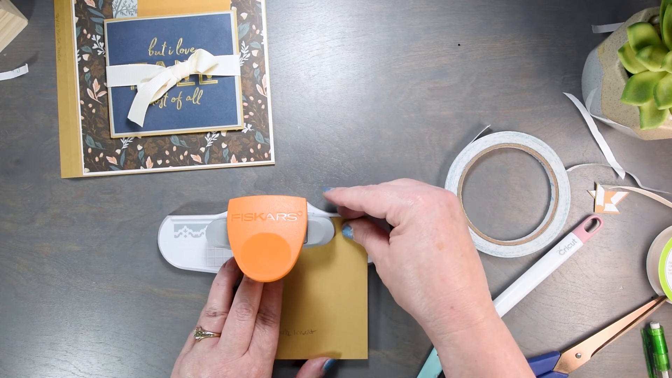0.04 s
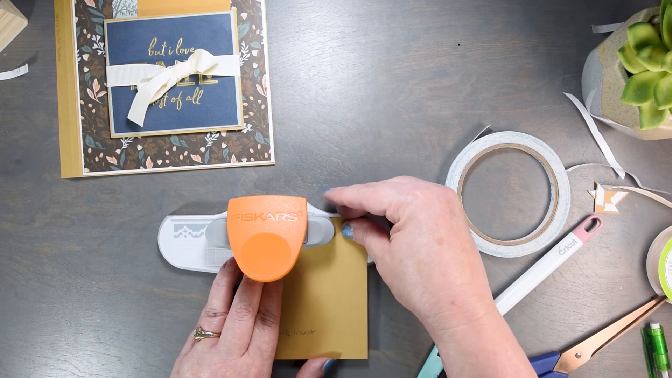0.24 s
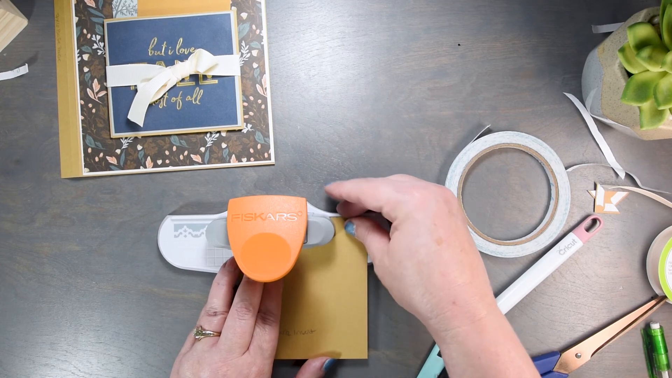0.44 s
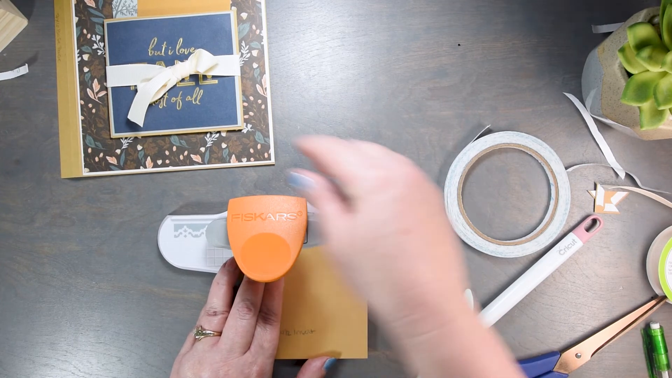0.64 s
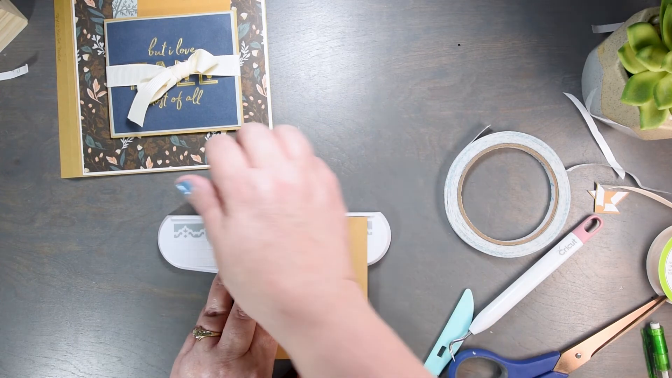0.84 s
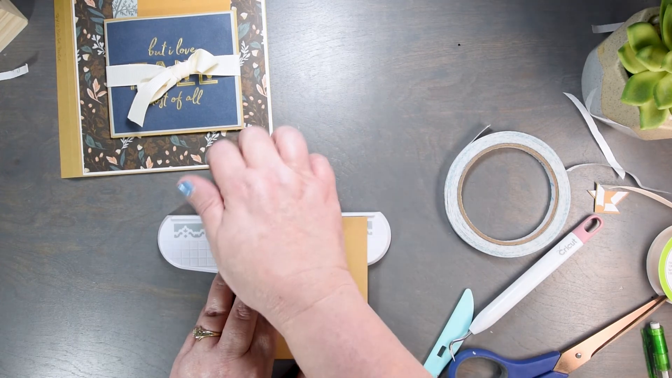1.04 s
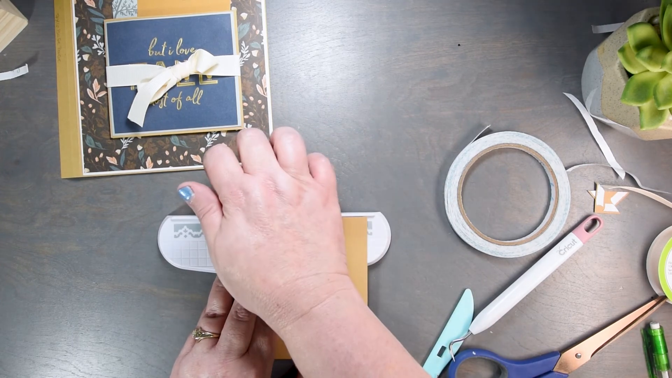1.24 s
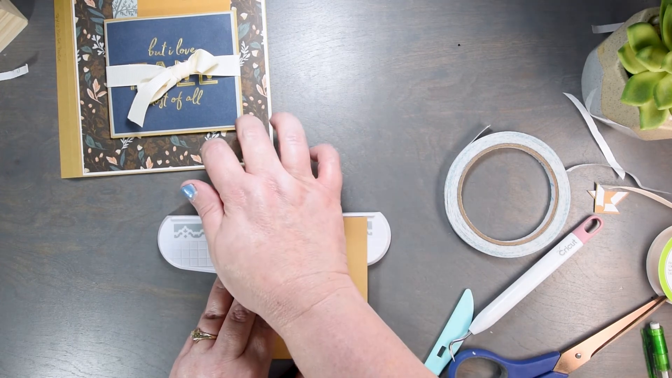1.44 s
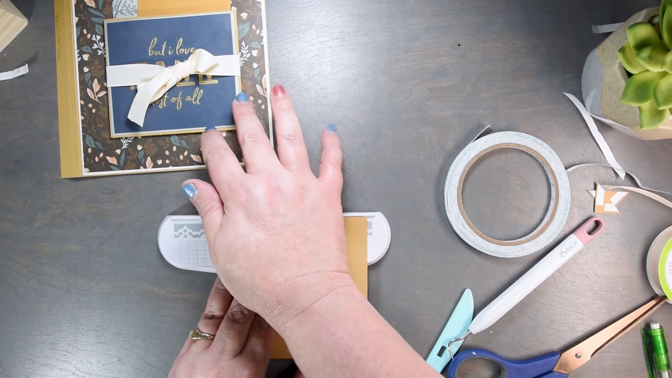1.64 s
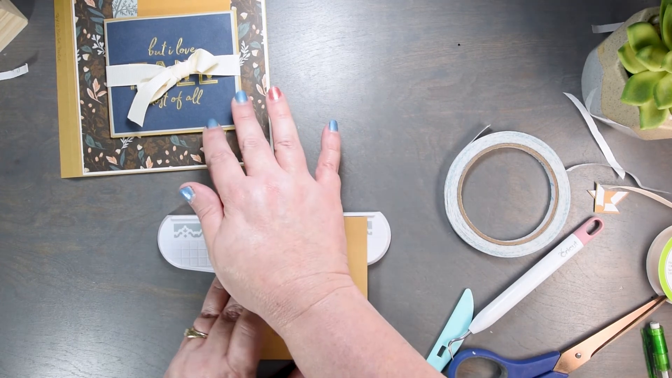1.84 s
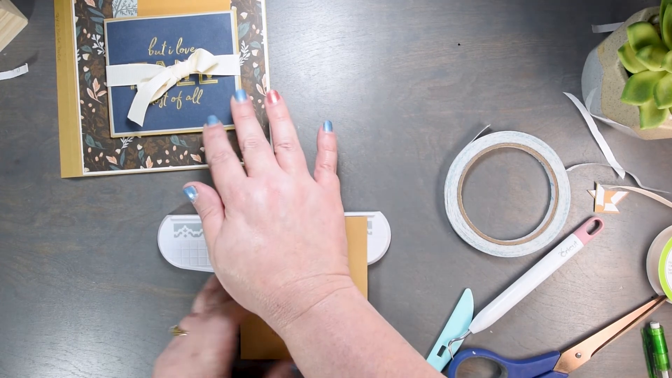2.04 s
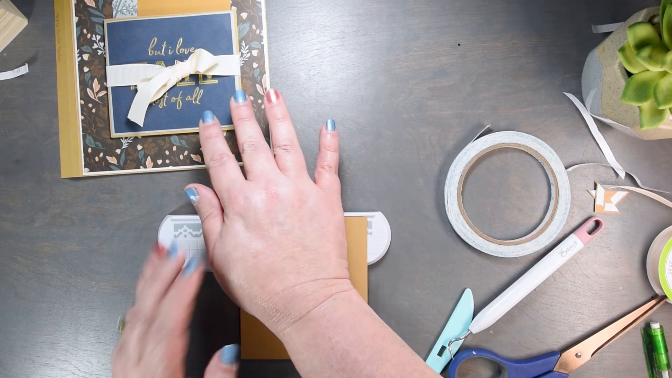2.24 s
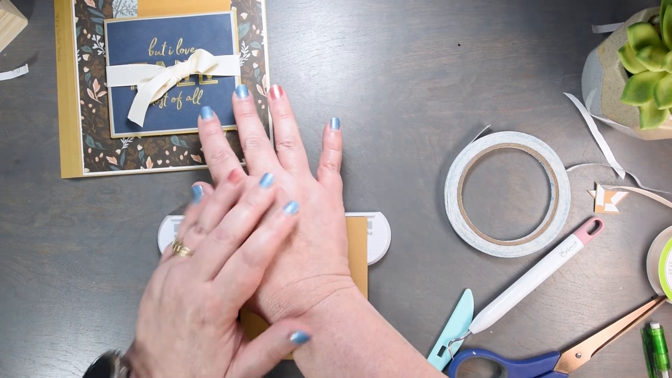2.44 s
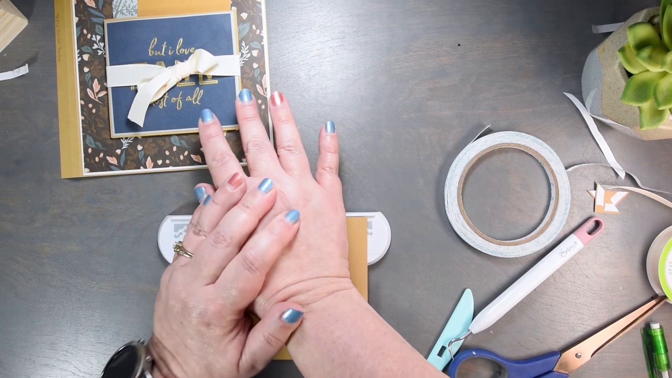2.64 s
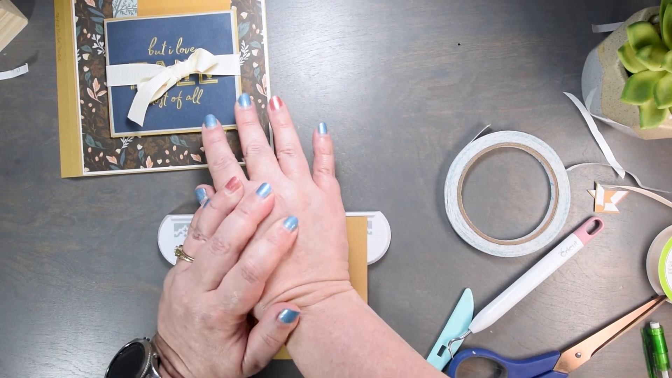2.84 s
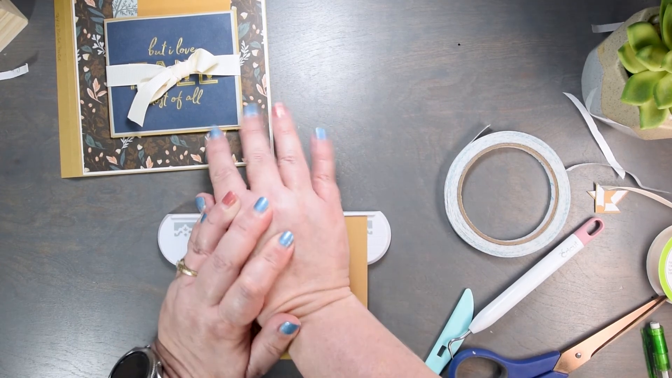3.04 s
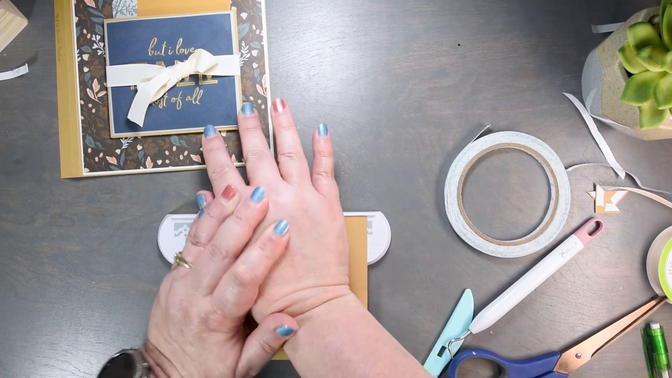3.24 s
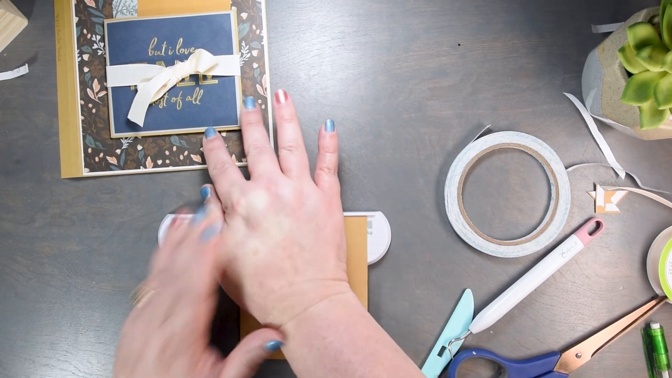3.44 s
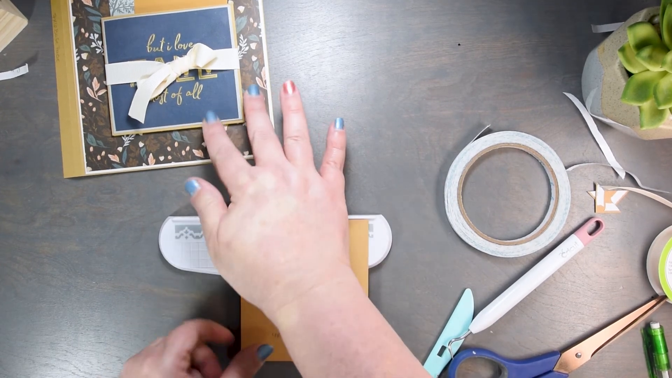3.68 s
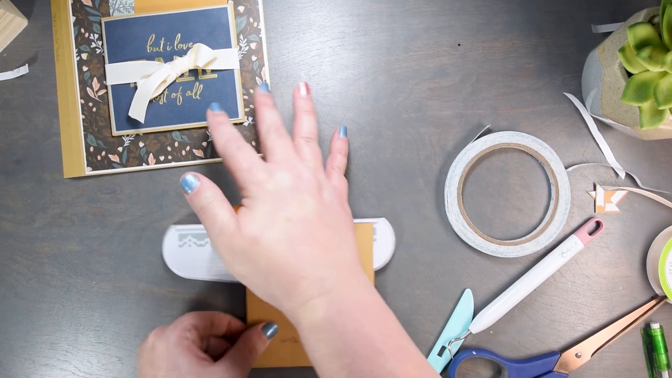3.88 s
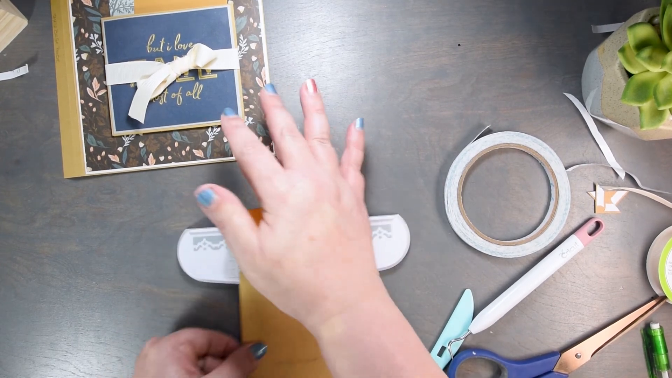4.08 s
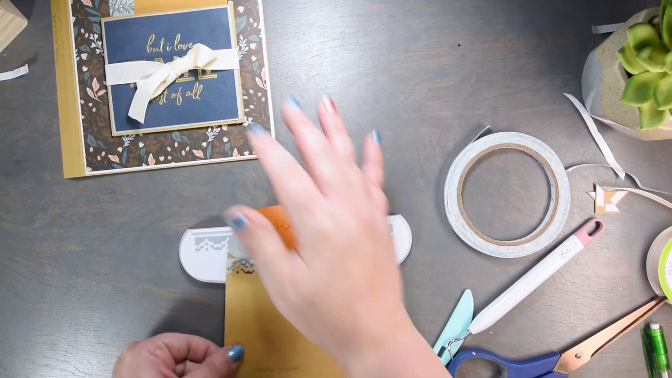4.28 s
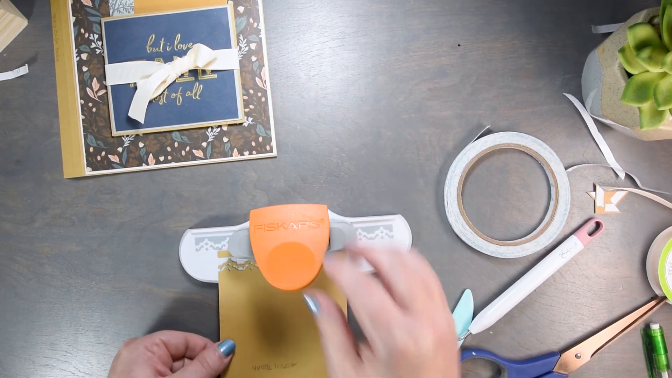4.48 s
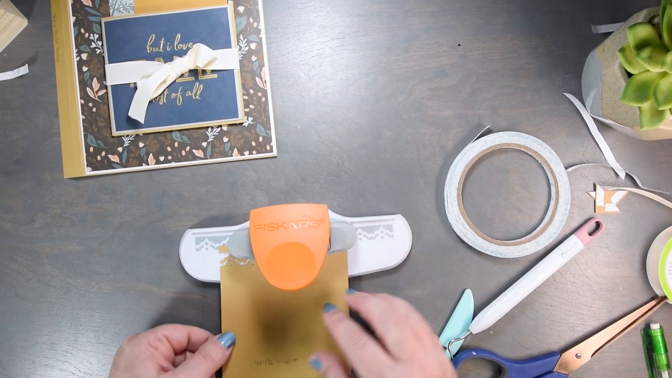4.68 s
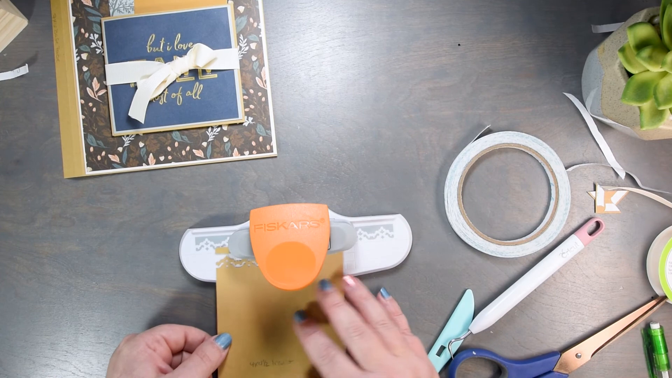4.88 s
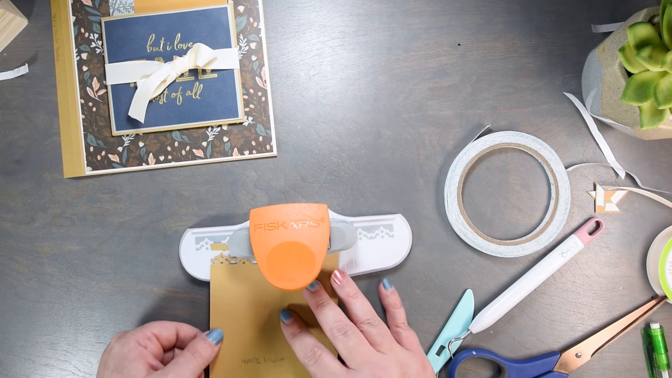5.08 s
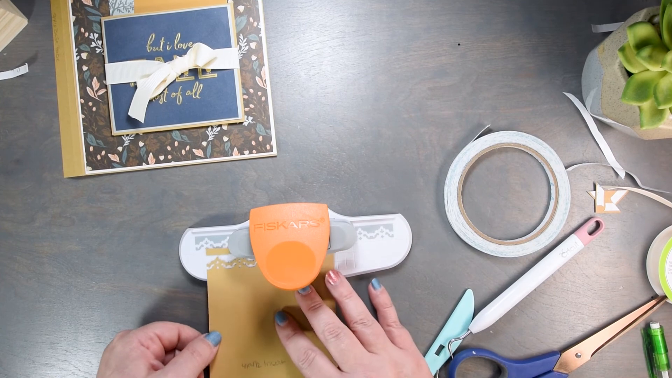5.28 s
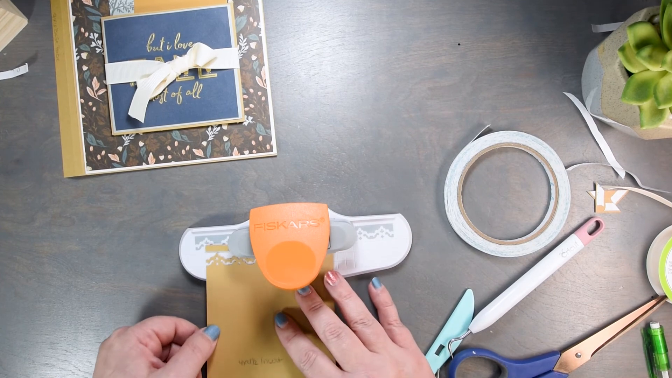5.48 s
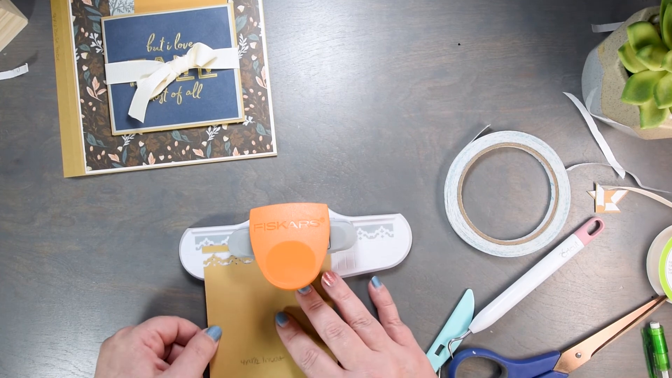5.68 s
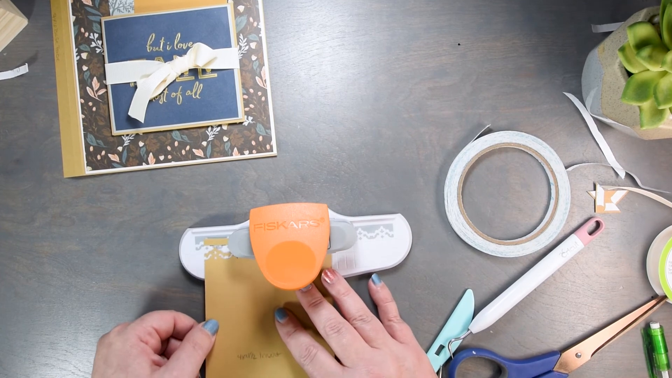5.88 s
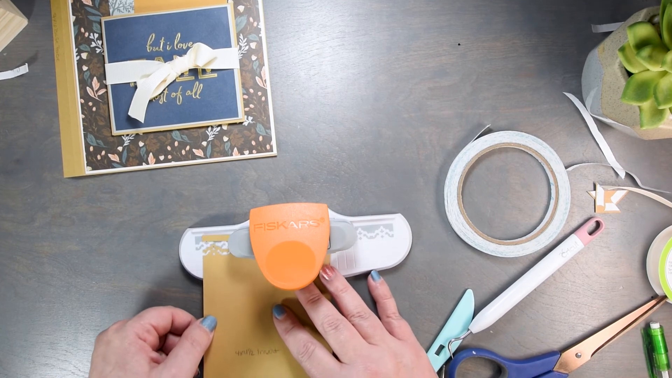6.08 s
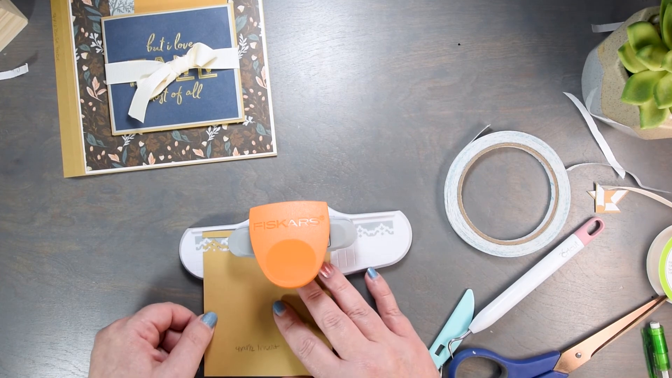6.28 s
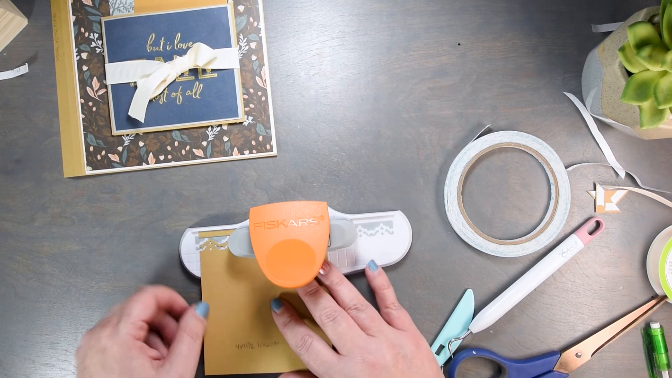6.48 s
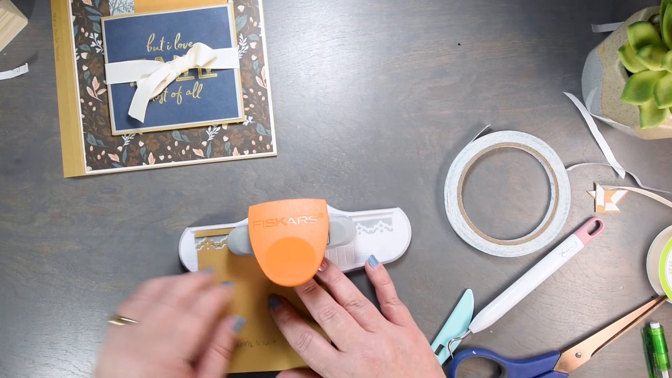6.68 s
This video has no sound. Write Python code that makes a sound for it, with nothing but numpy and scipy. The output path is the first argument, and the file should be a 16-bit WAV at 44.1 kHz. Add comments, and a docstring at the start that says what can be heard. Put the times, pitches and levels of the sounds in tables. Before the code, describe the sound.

Dull hand knocks on a plastic craft punch, then sharp cracking snaps through heavy paper, the last one loudest, followed by soft paper sliding and taps.

```python
"""Small furnished room, a wooden craft table: a plastic border punch, close under a microphone on an arm.
Dull knocks of the hand on the lever, then die snaps through heavy paper: noise bursts plus decaying modes.
Light taps ring before, between and after them. The sheet slides and is nudged by fingertips: shaped
friction noise. The arm sways, the room echoes over faint steady air, and the loudest cracks clip flat."""
import sys
import numpy as np
from scipy import signal
from scipy.fft import rfft, irfft
from scipy.io import wavfile
from scipy.ndimage import uniform_filter1d

SR = 44100
rng = np.random.default_rng(int(sys.argv[2]) if len(sys.argv) > 2 else 0)


def bounce(signal):
    """Save signal as a 16-bit WAV file at the path given by the first command-line argument."""
    frames = np.transpose(np.atleast_2d(signal))
    limited = np.clip(frames, -1, 1)
    pcm = np.round(limited * 32767).astype(np.int16)
    wavfile.write(sys.argv[1], SR, pcm)


N = 296352
T = np.arange(N) / SR
HIT = T[:SR]  # time axis of one blow, 1 s

# Dies snapping through paper. Each row: start in seconds, crack level in dB, nominal crunch length in ms,
# shell resonance in Hz, relative table thump level in dB.
SNAPS = [ (1.9742, 3, 3.43, 1250, -8), (1.984, -10.5, 7.1, 490, -13), (2.219, -31.5, 3.7, 2400, -37),
         (2.5897, -16, 2.05, 450, -13.5), (2.827, -3, 6.2, 700, -5), (3.0419, -13.5, 5.4, 2580, -15),
         (3.045, 7.5, 17.5, 2850, -.5), (3.063, 1, 15, 720, 0.5)]
TYPICAL_SNAP_MS = 4
# Relative spectrum of the plastic shell. Each row: frequency in Hz, density in dB per Hz.
SHELL_SPECTRUM = [(60, -24.5), (200, -5), (360, -8), (550, -2), (800, -4.5), (1050, -3), (1280, -2.5),
                  (1700, -4), (2250, -2.5), (3400, -5), (4500, -8), (6500, -12), (9000, -15.5),
                  (12000, -25.5), (16000, -25.5)]


def undb(db):
    """Decibels to amplitude gain."""
    return 10 ** (np.asarray(db) / 20)


def unit(x):
    """Scale to rms 1."""
    return x / np.sqrt(np.mean(x ** 2))


def add(out, start_s, x):
    """Mix x into out from start_s on, cut at the end of out."""
    i = max(0, int(start_s * SR))
    out[i:i + len(x)] += x[:len(out) - i]


def colour(x, points, tilt_db=0, ring_hz=1000, ring_db=0, ring_octaves=0.082, size=4096):
    """Minimum-phase filter: a spectrum, a tilt per octave above 2 kHz and one resonance."""
    f = np.maximum(np.fft.rfftfreq(size, 1 / SR), 1)
    hz, db = np.transpose(points)
    spectrum_db = np.interp(np.log(f), np.log(hz), db)
    spectrum_db = spectrum_db + tilt_db * np.log2(np.maximum(f / 2000, 1))
    peak = 1 / (1 + (np.log2(f / ring_hz) / ring_octaves) ** 2)
    gain = undb(spectrum_db) * (1 + (undb(ring_db) - 1) * peak)
    # folding the cepstrum makes the filter causal
    cepstrum = irfft(np.log(gain))[:size // 2]
    cepstrum[1:] *= 2
    response = irfft(np.exp(rfft(cepstrum, size)))
    return signal.fftconvolve(x, response)[:len(x)]


def ring(modes, t, scatter_db=0):
    """Sum of exponentially decaying sine modes; scatter_db spreads their levels at random."""
    out = 0
    for hz, db, t60_s in modes:
        level_db = db + scatter_db * rng.standard_normal()
        out = out + undb(level_db - 60 * t / t60_s) * np.sin(2 * np.pi * hz * t)
    return out


def punch():
    """Dull knocks as the hand settles, then sharp die snaps; longer crunches are duller and bounce lower."""
    # Hand knocking the lever. Each row: start in seconds, crack level in dB, nominal contact length in ms.
    knocks = [(0.952, -29.5, 5.9), (1.1481, -24.5, 2.4), (1.3745, -12.5, 4.0)]
    knock_ring_hz, knock_ring_db, knock_tilt_db_per_octave = 1213, 9.5, -4.5
    knock_thump_db = 8  # relative to the knock
    feet_hz, feet_hz_per_db = 221.3, 3  # bounce at the hardest knock; the feet stiffen with the load
    snap_ring_db, snap_tilt_db_per_octave, snap_bounce_hz = 6.5, -0.5, 236
    dulling_db, bounce_sag_octaves = 0.97, 0.21  # lost tilt and bounce pitch per doubling of length
    out = np.zeros(N)
    hardest_db = max(db for s, db, ms in knocks)
    for s, db, ms in knocks:
        bounce_hz = feet_hz + feet_hz_per_db * (db - hardest_db)
        add(out, s, blow(db, ms, knock_ring_hz, knock_ring_db, knock_tilt_db_per_octave))
        add(out, s, thump(db + knock_thump_db, bounce_hz))
    for s, db, ms, hz, table_db in SNAPS:
        doublings = np.log2(ms / TYPICAL_SNAP_MS)
        tilt_db = snap_tilt_db_per_octave - dulling_db * doublings
        add(out, s, blow(db, ms, hz, snap_ring_db, tilt_db))
        add(out, s, thump(table_db, snap_bounce_hz / 2 ** (bounce_sag_octaves * doublings)))
    return out


def blow(db, ms, hz, ring_db, tilt_db, modes_db=-26, spring_db=1.5, detune=0.006):
    """A blow cracks through the shell and rings lever, dies and return spring as decaying modes."""
    # Lever and die modes. Each row: nominal frequency in Hz, relative level in dB, t60 in seconds.
    lever_modes = [(614, -2, .13), (730, -2, .13), (864, -2, .12), (1010, -2, .11), (1170, -1, .12),
                   (1250, -2, .11), (1405, -4, .12), (1880, -3, .12), (2257, -2, .11), (2367, -2, .11),
                   (2805, -2, .1), (2945, -2, .12), (3752, -4, .1), (5475, -9, .1)]
    # Return spring modes. Each row: frequency in Hz, relative level in dB, t60 in seconds.
    spring_modes = [(1841, -66, 1), (3042, -62, 1)]
    # random detune per blow, as lever position and load vary
    modes = np.array(lever_modes)
    modes[:, 0] *= 1 + detune * rng.standard_normal(len(modes))
    lever = undb(modes_db) * ring(modes, HIT, scatter_db=1.0)
    spring = undb(spring_db) * ring(spring_modes, HIT)
    return undb(db) * (crack(ms, hz, ring_db, tilt_db) + lever + spring)


def crack(ms, hz, ring_db, tilt_db, evenness=0.55, grain_db=3.0):
    """A fast, dying noise burst through the plastic shell; energy of 5 ms at rms 1."""
    age = 1000 * HIT / ms
    spectrum = rfft(rng.standard_normal(len(HIT)) * np.exp(-age))
    # partly flatten the burst's spectrum, so no chance pitch stands out
    burst = irfft(spectrum / np.abs(spectrum) ** evenness) / (1 + (age / 3) ** 6)
    # level clusters about 1 ms long
    clusters = undb(grain_db * unit(uniform_filter1d(rng.standard_normal(len(HIT)), size=40)))
    shell = colour(burst * clusters, SHELL_SPECTRUM, tilt_db, hz, ring_db, ring_octaves=.2)
    return unit(shell) * np.sqrt(.005)


def thump(db, bounce_hz, board_db=-3.0, bounce_t60_s=0.044, radiate_hz=135):
    """The punch bounces on its feet and rings the table top, which radiates little at low frequencies."""
    # Table top modes. Each row: frequency in Hz, relative level in dB, t60 in seconds.
    table_modes = [(133.44, -13.5, 0.26), (185.3, -5.5, 0.15), (269, -16, 0.08), (460, -21.5, 0.12)]
    board = ring([(bounce_hz, 2, bounce_t60_s)], HIT) + ring(table_modes, HIT)
    highpass = signal.butter(4, radiate_hz, "high", fs=SR, output="sos")
    return -undb(db + board_db) * signal.sosfilt(highpass, board)


def taps():
    """Light contacts of nails, card and lever, no table thump; the higher they ring, the brighter."""
    # Each row: start in seconds, direct level in dB, ring in Hz.
    tap_rows = [ (0.587, -51.5, 1715), (1.097, -57, 1840), (1.583, -51, 1800), (1.643, -47, 2570),
                (1.661, -45.5, 465), (1.824, -49, 5000), (2.727, -51, 3210), (2.757, -53, 2950),
                (3.022, -36.5, 2350), (3.72, -49, 1890), (3.771, -45.5, 1370), (3.858, -35.5, 1420),
                (3.911, -37.5, 1170), (4.735, -38, 1286), (5.1722, -34, 2150), (5.666, -54, 2070),
                (6.343, -52, 1603)]
    tap_ms, tap_ring_db = 5.4, 15.5
    flat_hz, brightening_db = 2105, 18  # ring with no tilt; tilt gained per octave of ring
    out = np.zeros(N)
    for s, db, hz in tap_rows:
        tilt_db = np.clip(brightening_db * np.log2(hz / flat_hz), -13, 3)
        add(out, s, undb(db) * crack(tap_ms, hz, tap_ring_db, tilt_db))
    return out


def paper():
    """The sheet hisses as it slides, skin and base rub duller and hollow: filtered friction noise."""
    # Sheet over base. Each row: peak time in seconds, half length in seconds, relative level in dB.
    slides = [ (0.472, 0.0058, -49.5), (0.677, .09, -72.5), (1.799, 0.012, -56.5), (3.558, 0.031, -53.5),
              (3.68, 0.049, -52.5), (4.089, 0.061, -37.5), (4.431, 0.035, -54), (4.62, .13, -68),
              (4.919, 0.095, -63.5), (4.98, .028, -57), (5.223, .07, -61), (5.689, .026, -48.5),
              (6.028, 0.22, -67), (6.37, 0.027, -57.5), (6.485, 0.051, -50.5), (6.71, 0.043, -56.5)]
    # Fingertips and base. Each row: peak time in seconds, half length in seconds, relative level in dB,
    # resonance in Hz.
    rubs = [ (0.578, .011, -58, 182), (1.657, 0.026, -43, 254), (3.622, 0.092, -46.5, 182),
            (3.901, .06, -58, 1228), (4.086, 0.096, -47.5, 1150), (4.754, 0.035, -54, 940),
            (5.355, .019, -55.5, 1500), (5.427, 0.039, -63, 1231), (5.877, 0.037, -57.5, 820),
            (6.237, 0.018, -56, 1210), (6.353, 0.012, -48, 760), (6.358, 0.028, -58.5, 267),
            (6.626, 0.015, -62, 920)]
    # Sliding sheet, relative spectrum. Each row: frequency in Hz, density in dB per Hz.
    paper_spectrum = [(100, -19.5), (600, -18.5), (1100, -11.5), (1650, 0.5), (2150, 4.5), (2650, -4.5),
                      (3200, -5), (3550, -8), (3900, -5.5), (4600, -11), (6700, -15), (7800, -10.5),
                      (11000, -28.5), (16000, -29.5)]
    typical_half_s, typical_db = .035, -52  # quicker and stronger slides hiss brighter
    tilt_db_per_halving, tilt_db_per_db = 4.5, .5
    hiss, drag = friction(grain_db=4.0), friction(grain_db=3.0)
    out = fumble()
    for s, half_s, db in slides:
        tilt_db = tilt_db_per_db * (db - typical_db)
        tilt_db -= tilt_db_per_halving * np.log2(half_s / typical_half_s)
        out = out + stroke(colour(hiss, paper_spectrum, tilt_db), s, half_s, db)
    for s, half_s, db, hz in rubs:
        # soft skin drives mostly the range around its resonance
        skin = [(hz / 4, -26), (hz * 0.71, -10), (hz, 0), (hz * 1.31, -14), (hz * 8, -34), (16000, -60)]
        out = out + stroke(colour(drag, skin), s, half_s, db)
    return out


def friction(grain_db, uneven_db=2.5):
    """Noise of tiny uneven slips: level patches of about 4 ms and hand jerks of about 20 ms."""
    patches = unit(uniform_filter1d(rng.standard_normal(N), size=160))
    jerks = unit(uniform_filter1d(rng.standard_normal(N), size=900))
    return rng.standard_normal(N) * undb(grain_db * patches + uneven_db * jerks)


def stroke(x, peak_s, half_s, db, shape=1.6):
    """One hand movement: friction swells and fades with its speed; shape 1 is pointed, 2 a bell."""
    return unit(x) * undb(db) * np.exp(-np.abs((T - peak_s) / half_s) ** shape)


def fumble(catches_per_s=160, spread_db=3, skin_db=-19):
    """Restless fingers: random tiny catches of skin and card over a soft rub."""
    sizes = undb(spread_db * np.minimum(rng.exponential(size=N), 3))
    catches = (rng.random(N) < catches_per_s / SR) * sizes
    drag = catches + undb(skin_db) * friction(grain_db=1.0)
    touch = colour(drag, SHELL_SPECTRUM, tilt_db=-4.5, ring_hz=170, ring_db=17.5, ring_octaves=0.33)
    return unit(touch) * gripping()


def gripping(fade_s=0.058):
    """Finger activity: each grip fades in exponentially, holds and fades out."""
    # Each row: start of hold in seconds, end of hold in seconds, relative level in dB.
    grips = [(1.134, 1.92, -65), (2.721, 3.3, -56), (3.598, 4.184, -56.5), (4.75, 6.449, -70.5)]
    busy = 0
    for start_s, end_s, db in grips:
        outside_s = np.abs(T - np.clip(T, start_s, end_s))
        busy = busy + undb(db) * np.exp(-outside_s / fade_s)
    return busy


def sway():
    """The microphone arm's modes rock after each snap and lean; a long push favours the slowest swing."""
    # Arm modes. Each row: frequency in Hz, relative level in dB, t60 in seconds.
    arm_modes = [(17, 0, .75), (27, -16, .9), (37.5, 4, .27), (57, -4, .2)]
    # Hand leaning on the punch, rocking the table. Each row: start in seconds, push level in dB.
    leans = [(1.108, -30), (2.6, -23.5)]
    jolt_db, jolt_s, lean_s = -33, .016, .055  # jolt of a typical snap relative to its level; push lengths
    swing = ring(arm_modes, T[:2 * SR])
    pushes = [(s, db, lean_s) for s, db in leans]
    for s, db, ms, hz, table_db in SNAPS:
        pushes.append((s, db + jolt_db + 20 * np.log10(ms / TYPICAL_SNAP_MS), jolt_s))
    out = np.zeros(N)
    for s, db, push_s in pushes:
        push = np.hanning(int(push_s * SR))
        add(out, s, undb(db) * signal.fftconvolve(swing, push / push.sum()))
    return out


def room(x, gap_s=0.0055, build_s=0.0022):
    """Diffuse echoes: x convolved with noise that builds after a gap and decays band by band."""
    # Each row: band centre in Hz, echo level in dB, t60 in seconds.
    room_bands = [(130, -12.5, 0.29), (294, -7.5, 0.17), (605, -3.5, 0.2), (1540, -8, 0.26),
                  (3470, -6.5, 0.21), (7240, -8.5, 0.22), (13400, -10, 0.092)]
    hz, db, t60_s = np.transpose(room_bands)
    f = np.log(np.maximum(np.fft.rfftfreq(len(HIT), 1 / SR), 1))
    noise = rfft(rng.standard_normal(len(HIT)))
    build = 1 - np.exp(-np.maximum(HIT - gap_s, 0) / build_s)
    echoes = 0
    for share, band_db, band_t60_s in zip(np.eye(len(hz)), db, t60_s):
        fade = np.exp(-np.log(1000) * HIT / band_t60_s) * build
        band = irfft(noise * np.interp(f, np.log(hz), share))
        echoes = echoes + undb(band_db) * band * fade / np.linalg.norm(fade)
    return signal.fftconvolve(x, echoes)[:N]


def air():
    """Faint steady room air: white noise of unit density per Hz, filtered."""
    # Each row: frequency in Hz, density in dB per Hz.
    air_spectrum = [(10, -69), (25, -88.5), (60, -95.5), (170, -100), (400, -106), (800, -110.5),
                    (1900, -109.5), (4000, -116), (9000, -118), (16000, -118)]
    return colour(rng.standard_normal(N) * np.sqrt(SR / 2), air_spectrum, size=16384)


def scene(tap_room_db=-4, paper_db=-1):
    """Punch, taps and paper with their echoes, plus arm sway and air."""
    blows, ticks, rustle = punch(), taps(), undb(paper_db) * paper()
    echoes = room(blows + undb(tap_room_db) * ticks + rustle)
    return (blows + ticks + rustle + echoes + sway() + air())[None]


def record(dry):
    """The loudest cracks clip flat; a low-pass then cuts the top."""
    top_hz = 15600
    clipped = np.clip(dry, -1, 1)
    lowpass = signal.firwin(255, top_hz, fs=SR)
    return signal.fftconvolve(clipped, lowpass[None], mode="same", axes=1)


dry = scene()
out = record(dry)
bounce(out)
```